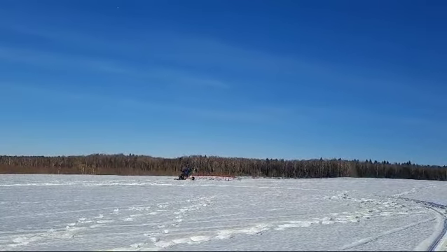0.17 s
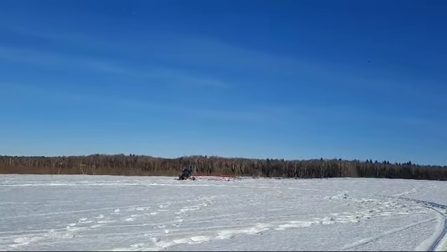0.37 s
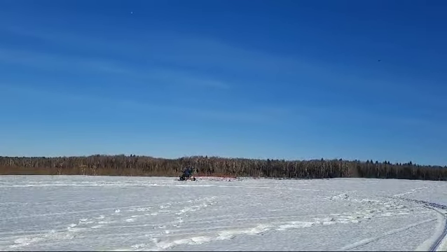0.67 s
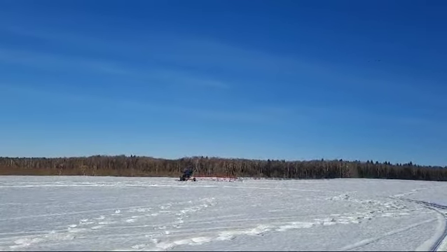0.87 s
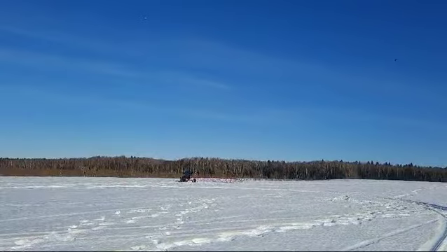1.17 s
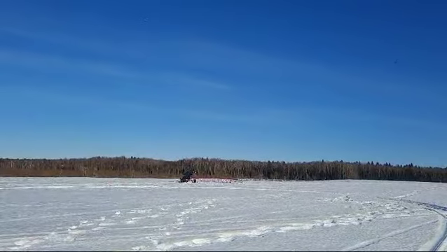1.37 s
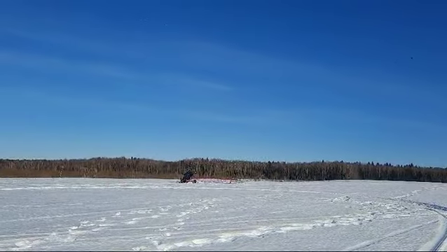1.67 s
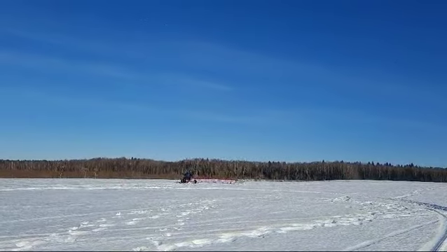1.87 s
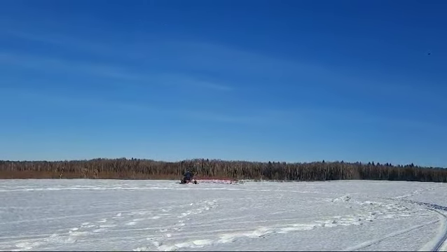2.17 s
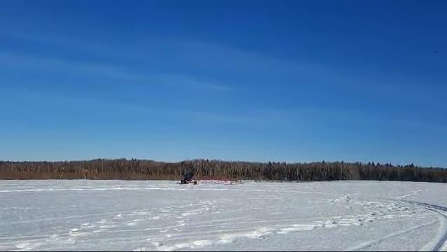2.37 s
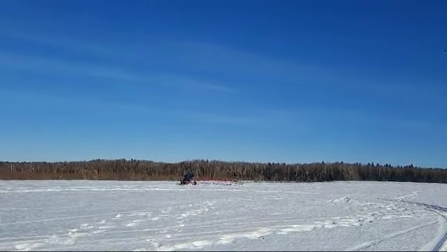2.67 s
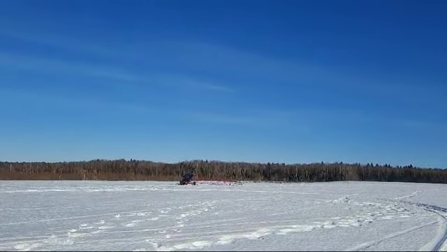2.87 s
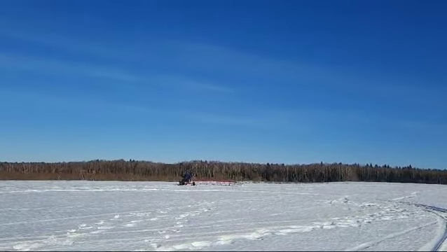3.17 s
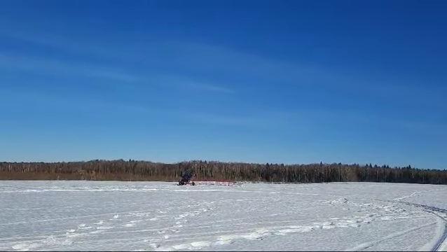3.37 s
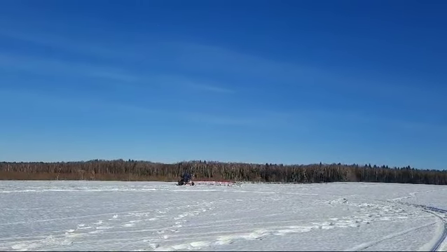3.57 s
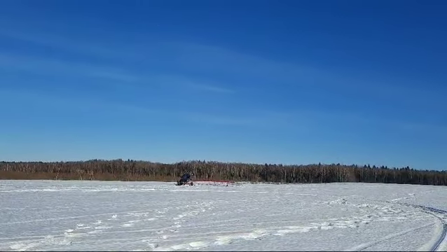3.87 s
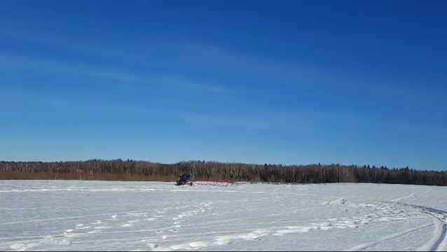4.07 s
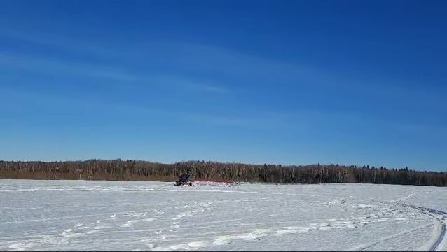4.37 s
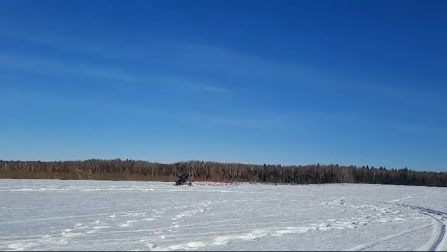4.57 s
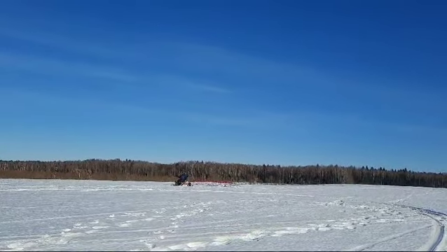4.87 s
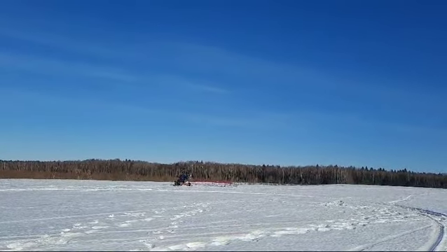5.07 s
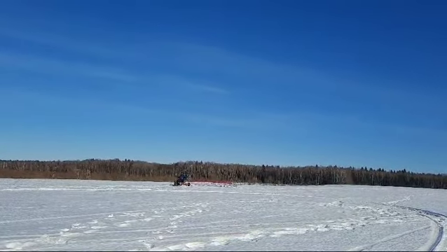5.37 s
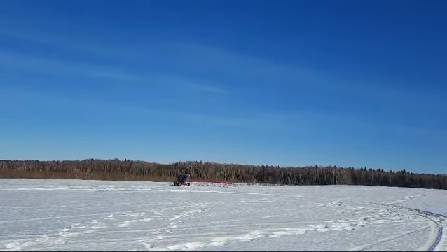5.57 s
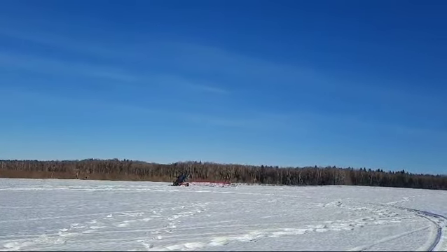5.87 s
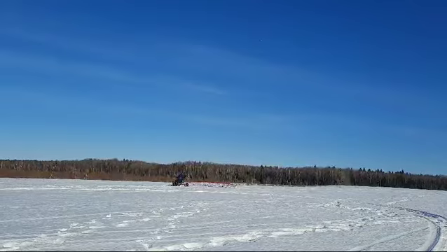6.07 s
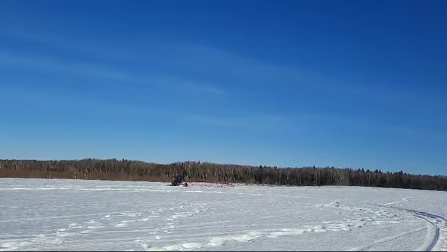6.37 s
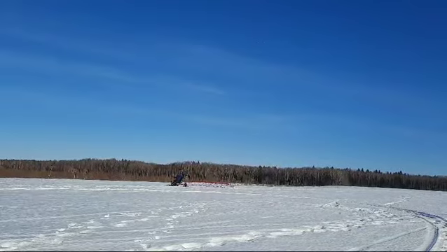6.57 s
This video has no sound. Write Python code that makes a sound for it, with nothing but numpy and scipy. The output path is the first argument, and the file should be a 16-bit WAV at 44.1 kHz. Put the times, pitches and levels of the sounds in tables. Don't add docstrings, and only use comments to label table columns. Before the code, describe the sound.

Far-off paramotor buzz swelling and fading on moving air, with dry irregular plastic ticks and faint gear whir right at the microphone.

```python
import sys
import numpy as np
from scipy import signal
from scipy.fft import rfft, irfft
from scipy.io import wavfile
from scipy.ndimage import uniform_filter1d, map_coordinates

SR = 44100
rng = np.random.default_rng(int(sys.argv[2]) if len(sys.argv) > 2 else 0)


def to_wav(sig):
    pcm = np.clip(np.atleast_2d(sig), -1, 1) * 32767
    pcm = np.round(pcm).astype(np.int16)
    wavfile.write(sys.argv[1], SR, pcm.T)


def magnitude_from_level(level_db):
    exponent = np.asarray(level_db, float) / 20
    return 10 ** exponent


N = 296352


def unit(x):
    return x / np.sqrt(np.mean(x ** 2) + 1e-20)


def along(points, hz):
    f, v = np.transpose(points)
    return np.interp(np.log(hz + 1), np.log(f + 1), v)


def curves(rows):
    s, *cols = np.transpose(rows)
    return [np.interp(np.arange(N) / SR, s, c) for c in cols]


def wobble(rate):
    return map_coordinates(rng.standard_normal(2000), [np.arange(N) * min(rate, 250) / SR])


def swells(rows):
    t = np.arange(N) / SR
    return sum(db * np.cos(np.pi * np.clip((t - s) / length, -.5, .5)) ** 2 for s, length, db in rows)


def filtered(x, response):
    n = x.shape[-1]
    return irfft(rfft(x) * response(np.fft.rfftfreq(n, 1 / SR)), n)


def modes(table, scatter_db=0):
    def response(f):
        total = 0
        for k, (centre, width, db) in enumerate(table):
            gain = (-1) ** k * magnitude_from_level(db + scatter_db * rng.normal())
            total = total + gain * 1j * f * width / (centre ** 2 - f ** 2 + 1j * f * width)
        return total
    return response


# [f/Hz, likeness 0-1]
LIKENESS = [(60, 0.99), (200, 1), (330, 0.94), (600, 0.96), (1000, 0.73), (1800, 0.88), (3500, 0.77),
            (5500, 1), (8000, .2), (10800, .5), (13000, .1)]


def pair(noise, response, firm=0):
    def mid_side(hz):
        angle = (1 - firm) * np.arccos(np.clip(along(LIKENESS, hz), -1, 1)) / 2
        return response(hz) * np.array([np.cos(angle), np.sin(angle)])
    mid, side = filtered(noise, mid_side)
    return np.array([mid + side, mid - side])


def rush(response, patchy_db, size=1024):
    z = signal.stft(rng.standard_normal((2, N)), nperseg=size)[2]
    field = rng.standard_normal(z.shape[1:])
    field = uniform_filter1d(uniform_filter1d(field, size=3, axis=0), size=4, axis=1)
    patchy = signal.istft(z * magnitude_from_level(patchy_db * unit(field)), nperseg=size)[1][:, :N]
    return unit(pair(patchy, response))


HUSH_S = .012


def bursts(rows, gain_db, rise_s, t60):
    out, busy, t = np.zeros(N + SR), np.zeros(N + SR), np.arange(SR // 8) / SR
    shape = (1 - np.exp(-t / rise_s)) * magnitude_from_level(-60 * t / t60)
    shape = shape / shape.max()
    for (s, db, hz), (start, drift, beat) in zip(rows, rng.uniform(-0.79, 1, (len(rows), 3))):
        ring = np.sin(2 * np.pi * hz * t * (1 + 0.66 * drift * t) + np.pi * start)
        ring += 0.43 * np.sin(2 * np.pi * hz * (1 + 0.22 * beat) * t)
        here = slice(round(s * SR), round(s * SR) + len(t))
        out[here] += magnitude_from_level(db + gain_db) * shape * ring
        busy[here] += shape
    ahead = busy[round(HUSH_S * SR):][:N]
    return out[:N], np.clip(np.maximum(busy[:N], ahead), 0, 1)


# [t/s, length/s, f/Hz, width/Hz, level/dB]
GEAR_SQUEAKS = [(.29, .2, 6100, 4300, -68.5), (.35, .14, 13840, 3020, -71), (.495, .05, 6150, 500, -65),
                (.3, .7, 6100, 3500, -73), (.5, .3, 8200, 300, -79), (.8, .23, 7500, 2500, -77),
                (.868, .025, 2800, 250, -60), (.5, .45, 6520, 4540, -76), (.724, .2, 13100, 5030, -78),
                (2.33, .32, 5200, 3800, -68), (2.25, .3, 6500, 5000, -77), (2.49, .15, 12450, 2480, -79.5),
                (2.994, .052, 6900, 560, -74), (2.99, .044, 4500, 5000, -66),
                (4.49, .08, 12900, 3340, -78.5)]


def squeaks():
    out = np.zeros((2, N))
    for s, length, hz, width, db in GEAR_SQUEAKS:
        n = round(length * SR)
        band = pair(rng.standard_normal((2, SR)), lambda f: modes([(hz, width, 0)])(f) ** 2)
        swell = magnitude_from_level(db + 1.8 * wobble(80)[:n]) * np.sqrt(np.hanning(n))
        out[:, round(s * SR):][:, :n] += swell * unit(band)[:, :n]
    return out


# [t/s, peak level/dB, high
# snap/dB, low knock/dB]
HARD_STEPS = [(0.067, -33.5, -21, -8), (0.4085, -36, -25, -6.5), (0.797, -40, -12.5, -9),
              (0.9748, -34, -21.5, -9.5), (1.119, -41, -20, -6), (1.427, -43.5, -20, -6),
              (1.641, -40, -20.5, -6), (1.8377, -36, -12, -9), (1.9619, -40, -31, -5),
              (2.087, -43, -16, -1.5), (2.228, -40.5, -19, -6.5), (2.371, -39, -18, -8),
              (2.986, -36, -20, -6.5), (3.184, -37.5, -18, -11.5), (3.4188, -39, -17, -5.5),
              (3.507, -39.5, -10, -10), (3.8611, -35, -21.5, -13.5), (4.233, -43.5, -10.5, -3.5),
              (4.393, -40.5, -18, -8.5), (4.663, -38, -15.5, -9.5), (4.803, -37, -17, -5.5),
              (4.9272, -35, -14.5, -8.5), (5.215, -44, -12.5, -3.5), (5.518, -30.5, -21.5, -13),
              (5.676, -39.5, -13, -7), (5.7642, -38, -16, -13), (5.871, -33, -18, -10),
              (6.0856, -38, -12, -10), (6.1954, -32, -19.5, -11), (6.6026, -41, -16, -6)]
# [t/s, peak
# level/dB]
FURTHER_STEPS = [(0.157, -44.5), (0.3208, -45.5), (0.565, -45.5), (0.7261, -42.5), (0.902, -48),
                   (1.2288, -41), (1.353, -44.5), (1.499, -41.5), (1.569, -46.5), (1.744, -54.5),
                   (2.479, -50), (2.5313, -47), (2.6, -45), (2.6707, -45.5), (2.8454, -45.5), (3.273, -45.5),
                   (3.7191, -44), (3.95, -46.5), (4.0205, -50), (4.0895, -44), (4.162, -48), (4.3385, -50.5),
                   (4.592, -46.5), (5.034, -58), (5.1433, -43.5), (5.3228, -49), (5.394, -47.5), (5.994, -45),
                   (6.336, -42.5), (6.551, -51),
                   (.227, -54), (.285, -56), (.476, -59.5), (1.301, -67.5), (1.32, -52), (1.8, -52.5),
                 (2.351, -62), (2.736, -64), (2.909, -54), (3.108, -57), (3.25, -61.5), (3.365, -54),
                 (3.682, -54), (3.772, -58.5), (3.81, -57.5), (4.478, -62), (4.52, -57), (4.554, -59),
                 (5.074, -50), (5.102, -58.5), (5.451, -53), (6.157, -59.5), (6.388, -50), (6.51, -53)]


def steps():
    rows = [tuple(row) for row in HARD_STEPS]
    for s, db in FURTHER_STEPS:
        knock_db = -7 - 0.44 * (db + 42)
        rows.append((s, db, -19, knock_db))
    return np.array(sorted(rows))


STEP_HZ = 56.25
# [t/s, level/dB]
DRIVE_EFFORT = [(0, 1.4), (.6, 1), (1.3, 0.5), (2.1, 0.5), (2.9, 1.7), (3.6, 0.5), (4.5, 0.5), (5.4, 2.5),
                (6.2, 1.5), (6.72, 2.5)]
# [f/Hz, width/Hz, level/dB]
WHIR_MODES = [(1574, 210, 10.5), (2273, 210, 7.5), (2840, 300, 6), (3500, 510, -1.5), (3970, 440, -0.5),
              (4870, 640, -5), (5600, 770, -6.5)]
# [f/Hz, level/dB per Hz]
GEAR_HISS = [(4000, -30), (5000, -3), (6000, 0), (7300, -7), (7900, -7.5), (8200, -1), (8500, -6.5),
             (9300, -12), (10500, -40)]
# [f/Hz, level/dB per Hz]
GEAR_FIZZ = [(8500, -30), (9600, -9), (10500, -4), (11000, -4), (11350, 1), (11700, -5), (13500, -4),
             (16000, -4)]


def drive():
    effort_db, = curves(DRIVE_EFFORT)
    times = steps()[:, 0]
    anchors = np.r_[times[0] - 9 / STEP_HZ, times, times[-1] + 9 / STEP_HZ]
    counts = np.cumsum(np.round(np.diff(anchors, prepend=anchors[0]) * STEP_HZ))
    step = np.interp(np.arange(N) / SR, anchors, counts)
    size = magnitude_from_level(2.4 * rng.standard_normal(1000))[step.astype(int)]
    gate = 1 + 0.073 * size * np.exp(-(step % 1) / 0.22)
    snap = 1 + .5 * size * np.exp(-(step % 1) / .09)
    whir = gate * rush(lambda f: np.abs(modes(WHIR_MODES)(f)) / (1 + (f / 5800) ** 8), patchy_db=2.1)
    hiss = snap * rush(lambda f: magnitude_from_level(along(GEAR_HISS, f)), patchy_db=2.8)
    fizz = snap * rush(lambda f: magnitude_from_level(along(GEAR_FIZZ, f)), patchy_db=1.3)
    out = magnitude_from_level(-58.5 + 1.4 * effort_db) * unit(whir)
    out += magnitude_from_level(-81 + 1.5 * effort_db) * unit(hiss)
    out += magnitude_from_level(-79 + .9 * effort_db) * unit(fizz)
    return out


# [f/Hz, width/Hz, level/dB]
KNOCK_MODES = [(1640, 270, 9.5), (2284, 180, 10), (2810, 700, 4)]
# [f/Hz, width/Hz, level/dB]
CLICK_MODES = [(3130, 2700, -12), (4150, 150, 3.5), (4650, 380, 0), (5600, 380, 0), (6100, 790, -7.5),
               (6980, 360, -11.5)]
# [f/Hz, width/Hz, level/dB]
SNAP_MODES = [(8100, 190, 1), (10940, 520, 2.5), (11400, 370, 6.5), (13000, 1200, -10), (15000, 980, -13.5)]


def ticks():
    out, t = np.zeros((2, N + SR)), np.arange(3072) / SR
    for s, db, snap_db, knock_db in steps():
        pan_db = -1 + 3 * rng.normal()
        lag = rng.uniform(.0015, .004)
        groups = [(KNOCK_MODES, knock_db + 9, .016, .3),  # modes, dB, T60 in s, rebound
                  (CLICK_MODES, -3, .012, .2),
                  (SNAP_MODES, snap_db + 4, .006, .15)]
        for shell, level_db, t60, rebound in groups:
            rattle = magnitude_from_level(-60 * t / t60)
            rattle += rebound * (t > lag) * magnitude_from_level(-60 * (t - lag) / (4 * t60))
            blow = rattle * rng.standard_normal((2, len(t)))
            blow[0, 4] += 6.5
            ring = pair(blow, modes(shell, scatter_db=3.5), firm=.25)
            gain = magnitude_from_level(db + level_db + np.array([[.3], [-.3]]) * pan_db)
            out[:, round(s * SR):][:, :len(t)] += gain * 0.089 * unit(ring)
    return out[:, :N]


# [t/s, peak level/dB, f/Hz]
STEP_RINGS = [(0.0664, -40.5, 4500), (0.157, -45, 4100), (0.4075, -46, 3220), (0.7257, -49, 4700),
              (0.798, -48.5, 4500), (0.9738, -40, 4180), (1.118, -43.5, 3200), (1.2286, -48, 4730),
              (1.3553, -46, 4800), (1.4267, -41, 4100), (1.498, -48, 4530), (1.5664, -46, 3490),
              (1.6393, -39.5, 4060), (1.836, -38, 3970), (1.9603, -32.5, 4150), (2.0862, -44, 3970),
              (2.2292, -36, 4560), (2.3696, -38, 4150), (2.6, -53, 3320), (2.669, -47, 4090),
              (2.8443, -39.5, 4030), (2.985, -37.5, 4170), (3.1812, -42, 4150), (3.271, -40.5, 3500),
              (3.4188, -44.5, 3860), (3.506, -40.5, 4070), (3.7184, -52.5, 3400), (3.861, -37, 3380),
              (3.9468, -43.5, 3150), (4.0901, -43, 4110), (4.2318, -46, 3150), (4.337, -44, 3900),
              (4.3922, -42, 4120), (4.6613, -40.5, 4080), (4.8035, -45.5, 3300), (4.9267, -36, 3400),
              (5.1435, -49, 4600), (5.215, -43, 3190), (5.3223, -46.5, 3360), (5.5163, -39.5, 4930),
              (5.676, -35, 3980), (5.7633, -40, 3490), (5.8688, -38.5, 4180), (5.9933, -41, 3510),
              (6.0862, -38.5, 4070), (6.1952, -36, 4600), (6.3353, -61, 3370), (6.603, -45.5, 4660)]
# [t/s, peak level/dB, f/Hz]
STEP_THUDS = [(0.0677, -43, 1700), (0.4075, -47.5, 1760), (0.7966, -45.5, 2360), (0.9757, -48.5, 1750),
              (1.1184, -41.5, 1700), (1.2291, -41.5, 2220), (1.6417, -39.5, 2180), (1.8367, -43, 2200),
              (1.9614, -40, 2270), (2.0887, -35, 2200), (2.2313, -37.5, 2190), (2.371, -45, 2130),
              (2.9856, -40.5, 2250), (3.2725, -45, 1850), (3.8611, -43, 2220), (4.3924, -44.5, 1830),
              (4.6643, -46, 1730), (4.8035, -43, 2240), (4.9272, -35.5, 2260), (5.216, -40, 1710),
              (5.5174, -41, 2700), (5.676, -45, 1760), (5.7658, -42, 1850), (5.8701, -41, 2280),
              (6.1968, -41, 2230), (6.3355, -40.5, 1970)]


def favoured_modes():
    rings, _ = bursts(STEP_RINGS, gain_db=-11, rise_s=0.00024, t60=0.037)
    thuds, _ = bursts(STEP_THUDS, gain_db=-9.5, rise_s=.0008, t60=0.081)
    return rings + thuds


def roar_top(f):
    return 1 / (1 + (f / 1700) ** 8)


def distant_band(shape):
    return rush(lambda f: magnitude_from_level(along(shape, f)) * roar_top(f), patchy_db=1, size=4096)


DUCK_DB = -3
# [f/Hz, level/dB per Hz]
LOW_THRUM = [(20, -48.5), (35, -15), (55, 2), (80, 6), (110, -1), (150, -9.5), (250, -79.5)]


def rumble(loud_db):
    return magnitude_from_level(-41 + 0.36 * (loud_db - loud_db.mean())) * distant_band(LOW_THRUM)


# [f/Hz, level/dB per Hz]
WASH_SPECTRUM = [(60, -50.5), (100, -9), (150, -2), (190, -1.5), (235, -8), (320, -39.5), (500, -91)]
# [t/s, peak level/dB, f/Hz]
WASH_THUMPS = [(0.099, -17, 202.7), (0.19, -16, 185.3), (0.373, -17.5, 174.7), (0.471, -17, 224.5),
               (0.549, -11.5, 205), (0.728, -23, 179), (0.788, -22, 179.6), (0.911, -17, 200),
               (1.017, -9, 223), (1.098, -8.5, 238.7), (1.211, -15, 179), (1.331, -18.5, 165.2),
               (1.485, -16.5, 133.4), (1.661, -16.5, 229.5), (1.902, -15.5, 147), (2.026, -22, 184.6),
               (2.154, -17.5, 226), (2.278, -15.5, 180), (2.337, -19.5, 169), (2.436, -15.5, 199),
               (2.611, -17.5, 151), (2.724, -16.5, 165.5), (3.222, -22, 168), (3.286, -16, 173),
               (3.492, -13, 176.5), (4.002, -24.5, 155.3), (4.108, -23, 190.4), (4.724, -23.5, 181.3),
               (4.806, -25.5, 233), (4.941, -24.5, 178.7), (5.054, -15, 154.2), (5.232, -20, 220.4),
               (5.383, -18, 175.7), (5.813, -19, 197), (5.939, -17, 176.5), (6.034, -15.5, 245.5),
               (6.19, -17, 230), (6.355, -15.5, 181.8), (6.426, -20, 164), (6.659, -21.5, 198.7)]


def propeller_wash(loud_db, turn, surge_db, gust_db, flutter):
    thumps, thumping = bursts(WASH_THUMPS, gain_db=-5.5, rise_s=0.0087, t60=0.15)
    wash_db = loud_db + 0.85 - 6.5 * turn + 0.045 * surge_db + 0.26 * gust_db
    wash_db += DUCK_DB * thumping + 0.089 * flutter
    return thumps + magnitude_from_level(wash_db) * distant_band(WASH_SPECTRUM)


# [f/Hz, level/dB per Hz]
BLADE_SPECTRUM = [(250, -45), (350, -3), (450, 1), (580, 0), (750, -6), (1000, -20.5), (1300, -29.5),
                  (1700, -48), (2500, -100)]
# [f/Hz, level/dB per Hz]
TIP_SPECTRUM = [(500, -48.5), (800, 13), (1000, 6), (1250, -8.5), (1500, -19), (2200, -86)]
# [t/s, peak level/dB, f/Hz]
BLADE_SLAPS = [(0.161, -21.5, 753), (0.413, -21, 627), (0.479, -19.5, 610), (0.566, -22.5, 544),
               (0.834, -19.5, 548), (0.942, -19, 549), (0.998, -14, 535), (1.1, -15.5, 597),
               (1.174, -16.5, 699), (1.293, -16, 575), (1.541, -16.5, 611), (1.598, -18, 638),
               (1.763, -21, 643), (1.867, -19.5, 581), (2.019, -17.5, 549), (2.1, -17, 503),
               (2.646, -19.5, 526), (2.702, -17, 640), (2.763, -19.5, 562), (2.916, -17, 577),
               (2.993, -15.5, 575), (3.09, -20, 543), (3.225, -13.5, 595), (3.303, -11.5, 501),
               (3.386, -14.5, 684), (3.506, -27.5, 580), (4.509, -27.5, 626), (4.852, -20.5, 643),
               (5.035, -29, 612), (5.264, -14, 600), (5.316, -17.5, 536), (5.433, -16, 606),
               (5.613, -20, 568), (5.708, -18.5, 640), (5.757, -17, 617), (5.827, -19, 513),
               (5.881, -16.5, 585), (5.962, -22.5, 561), (6.187, -18.5, 632), (6.329, -11, 623),
               (6.396, -16.5, 536), (6.486, -16, 560), (6.542, -19, 613), (6.686, -21, 640)]


def propeller_blades(loud_db, turn, gust_db, flutter):
    slaps, slapping = bursts(BLADE_SLAPS, gain_db=-5.5, rise_s=.0045, t60=.09)
    blades_db = loud_db - 4.2 + 2.5 * turn + gust_db + DUCK_DB * slapping
    tips_db = -9.5 - 14.5 * turn + 0.38 * gust_db
    bands = distant_band(BLADE_SPECTRUM) + magnitude_from_level(tips_db) * distant_band(TIP_SPECTRUM)
    return magnitude_from_level(blades_db + 0.071 * flutter) * bands, slaps


# [f/Hz, width/Hz, level/dB]
SILENCER = [
    (285, 120, 0),
    (316, 105, 0),
]
# [t/s, peak level/dB, f/Hz]
EXHAUST_BARKS = [(0.26, -32.5, 310), (0.369, -17.5, 285), (0.527, -18.5, 291), (0.581, -21, 269.5),
                 (0.767, -17, 317.6), (0.833, -13, 294), (0.977, -12.5, 345), (1.122, -11, 295.3),
                 (1.2, -19, 242), (1.311, -12.5, 313), (1.414, -6, 278.6), (1.61, -18, 305),
                 (1.703, -20.5, 255), (1.861, -16.5, 312.7), (1.968, -13, 286), (2.08, -13.5, 306),
                 (2.24, -28, 298), (2.48, -8.5, 279), (2.569, -31.5, 324), (2.7, -15, 289.3),
                 (2.81, -12, 301), (3.159, -17, 301.6), (3.233, -11.5, 330), (3.333, -11, 312),
                 (3.396, -15.5, 259), (3.576, -14.5, 298), (3.631, -13.5, 297), (3.878, -12, 317),
                 (4.298, -24.5, 316.5), (4.361, -23, 297), (4.97, -19.5, 325), (5.026, -14.5, 313.5),
                 (5.183, -16, 308.6), (5.286, -11.5, 310.5), (5.316, -14, 337), (5.375, -15.5, 331),
                 (5.402, -13.5, 325), (5.461, -11, 303), (5.713, -14, 296), (5.752, -13.5, 291),
                 (5.783, -16, 306), (5.883, -23, 348), (6.009, -15, 289), (6.274, -16.5, 332),
                 (6.367, -15, 248.3), (6.414, -19, 329), (6.521, -27.5, 285.4), (6.703, -17, 352)]


def exhaust(loud_db, turn, surge_db, gust_db, flutter):
    def silencer(mode):
        return rush(lambda f: modes([mode])(f) ** 2 * np.sqrt(roar_top(2 * f)), patchy_db=1.2, size=4096)
    side_on, turned = [silencer(mode) for mode in SILENCER]
    barks, barking = bursts(EXHAUST_BARKS, gain_db=-4, rise_s=0.0034, t60=0.14)
    exhaust_db = loud_db - 1 + surge_db + 0.075 * gust_db + DUCK_DB * barking
    tone = np.sqrt(1 - turn) * side_on + np.sqrt(turn) * turned
    return magnitude_from_level(exhaust_db + 1.2 * flutter) * tone, barks


# [f/Hz, width/Hz, level/dB]
BOUNCE_NOTCH = [
    (392.4, 140, 0.01),
    (450, 132, 0),
]


def snow_bounce(roar, turn):
    strength = 0.48 + 0.89 * turn - 0.097 * np.abs(wobble(5))
    ports = np.array([[1.05], [.95]])
    early, late = [filtered(roar, lambda f: modes([mode])(f * ports)) for mode in BOUNCE_NOTCH]
    return roar - np.clip(strength, 0, 1) * ((1 - turn) * early + turn * late)


# [t/s, level/dB, turn 0-1]
CRAFT_PATH = [(0, -26, 0), (.9, -24, 0.14), (1.4, -25, 0.2), (1.8, -24, 0.2), (2.2, -26, 0.3),
              (2.9, -24, 0.5), (3.5, -19.5, 0.7), (3.75, -27.5, 0.55), (4.1, -28.5, 0.5), (4.6, -29.5, .7),
              (5.0, -25, 0.87), (5.6, -24.5, 0.9), (6.1, -27.5, 0.5), (6.72, -28, 0.7)]
# [t/s, length/s, level/dB]
ENGINE_SURGES = [(.17, .3, 7.5), (.5, 0.042, 5), (.78, 0.16, 8), (1.06, 0.24, 4.5), (1.6, 0.66, 7.5),
                 (2.1, 0.082, 0.5), (2.45, 0.43, 4), (2.8, 0.44, -0.5), (3.3, 0.68, 5), (3.9, 0.51, 6),
                 (4.22, 0.53, 5.5), (4.97, 0.21, 8.5), (5.38, 0.4, 5.5), (5.76, 0.41, 6), (6.03, 0.18, 5),
                 (6.38, 0.59, 3)]
# [t/s, length/s, level/dB]
AIR_GUSTS = [(.22, 0.25, 4.5), (.43, 0.37, 3.5), (.85, 0.091, -3), (1.17, 0.61, 5.5), (1.6, 0.25, 3),
             (2.4, 0.26, 2.5), (2.58, 0.1, -6), (2.78, 0.16, 7), (3.05, 0.26, 3), (3.41, 0.13, 0.5),
             (4.97, 0.54, 0), (5.33, 0.51, 3.5), (5.56, 0.29, -2), (5.77, 0.32, 6.5), (5.98, 0.33, 10),
             (6.15, 0.17, 2.5), (6.37, 0.39, 7.5), (6.6, 0.74, 4)]
# [t/s, length/s, level/dB]
GUST_FLARES = [(.43, 0.075, 4.5), (1.18, .09, 4.5), (1.6, 0.091, 4), (2.78, 0.12, 0), (3.39, 0.14, 6.5),
               (5.75, 0.041, 2), (5.99, 0.093, 0), (6.35, 0.14, 2)]


def paramotor():
    loud_db, turn = curves(CRAFT_PATH)
    turn = np.clip(turn, 0, 1)
    surge_db = swells(ENGINE_SURGES)
    gust_db = swells(AIR_GUSTS) + swells(GUST_FLARES)
    flutter = wobble(35)
    firing_roar, barks = exhaust(loud_db, turn, surge_db, gust_db, flutter)
    blade_roar, slaps = propeller_blades(loud_db, turn, gust_db, flutter)
    roar = snow_bounce(firing_roar + blade_roar, turn)
    wash = propeller_wash(loud_db, turn, surge_db, gust_db, flutter)
    return roar + barks + slaps + wash + rumble(loud_db)


def scene():
    camera = squeaks() + drive() + ticks() + favoured_modes()
    return camera + paramotor()


def top_cut(x):
    return signal.sosfilt(signal.butter(12, 15820, fs=SR, output="sos"), x)


# [f/Hz, left-right level/dB]
PORT_LEAN = [(40, -0.5), (200, 2), (330, 1.5), (550, 3.5), (900, 2.5), (1500, 1.5), (2700, 4.5), (4500, 5),
             (6500, -3), (8200, -12), (9800, -9), (12500, 1), (15000, -4.5)]
# [f/Hz, left lead/radians]
PORT_LEAD = [(40, -1.4), (150, 0.2), (1000, 0.21), (2000, 0.26), (3200, 0.53), (4500, -0.1), (7300, -2.1),
             (9000, -3), (11500, 1.2)]


def record(dry):
    dip_hz, width_hz, share = 9550, 550, .35

    def ports(hz):
        dip = 1 - share * np.exp(-((hz - dip_hz) / width_hz) ** 2)
        left_over_right = magnitude_from_level(along(PORT_LEAN, hz)) * np.exp(1j * along(PORT_LEAD, hz))
        return dip * left_over_right ** np.array([[.5], [-.5]])
    edge = SR // 10
    mirrored = np.pad(dry, ((0, 0), (edge, edge)), "reflect")
    heard = filtered(mirrored, ports)[:, edge:-edge]
    return top_cut(heard)


dry = scene()
out = record(dry)
to_wav(out)
```